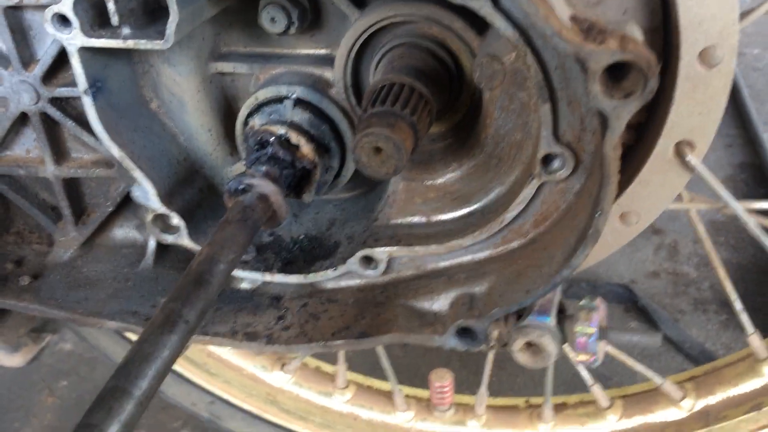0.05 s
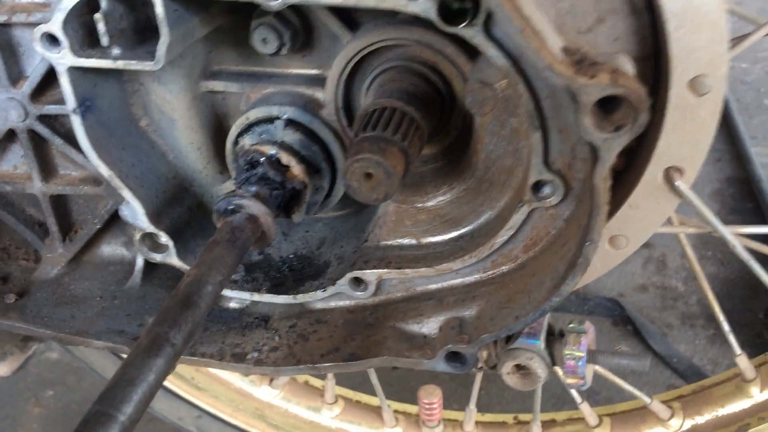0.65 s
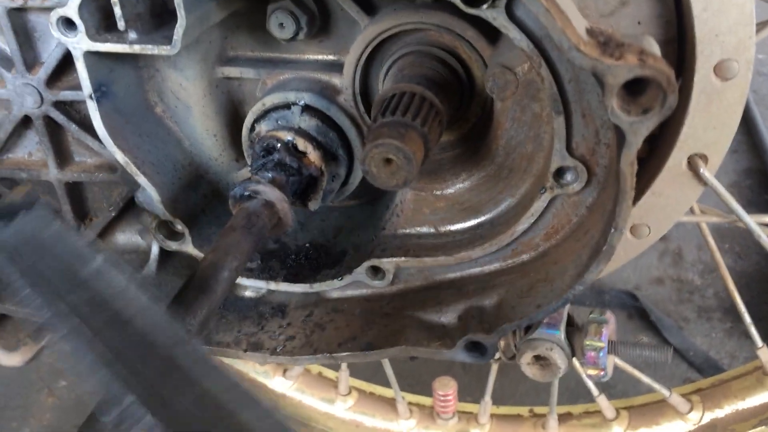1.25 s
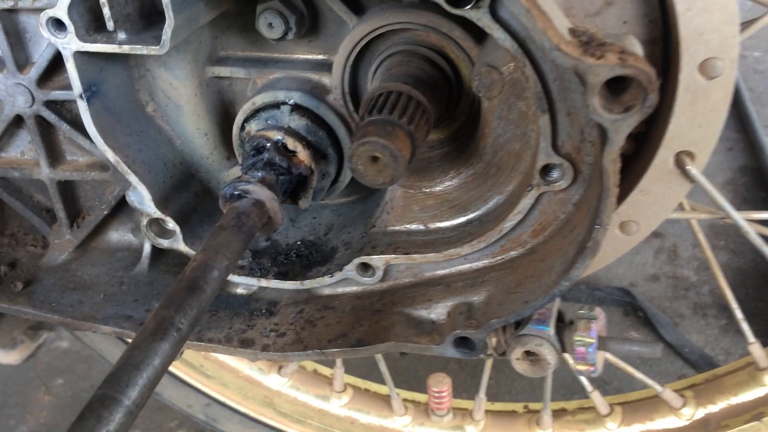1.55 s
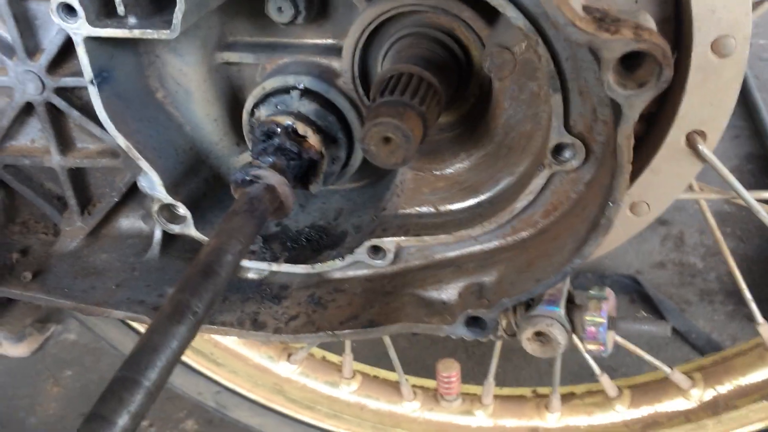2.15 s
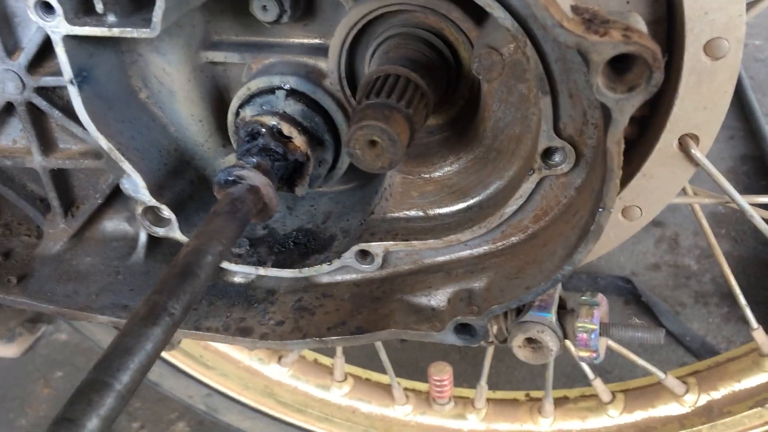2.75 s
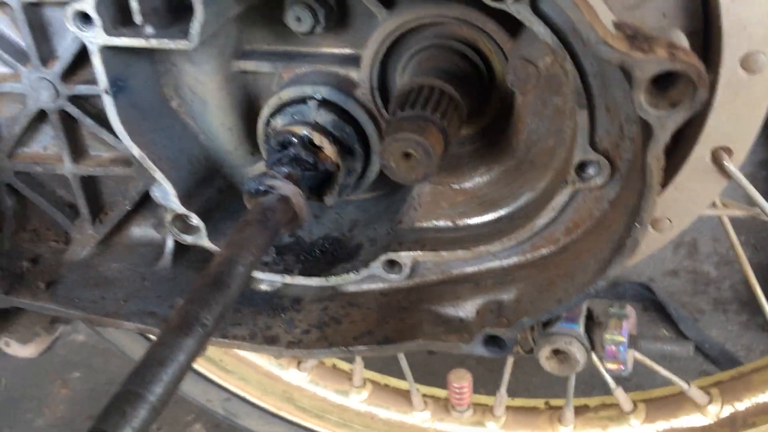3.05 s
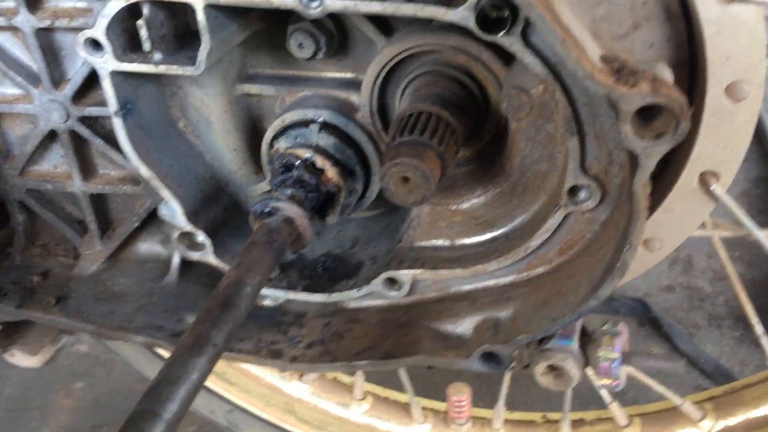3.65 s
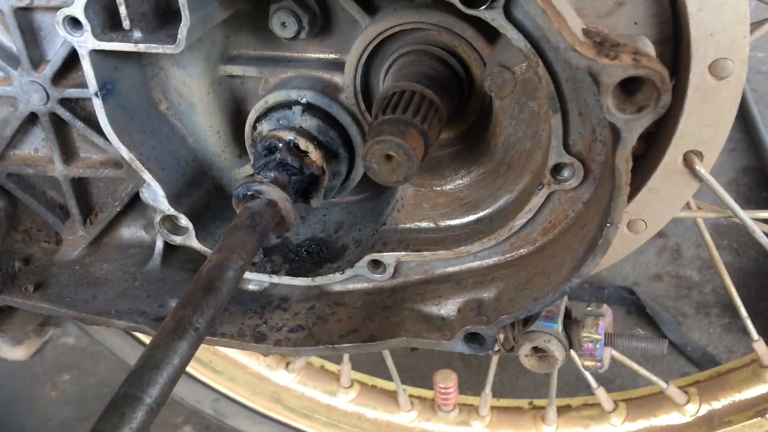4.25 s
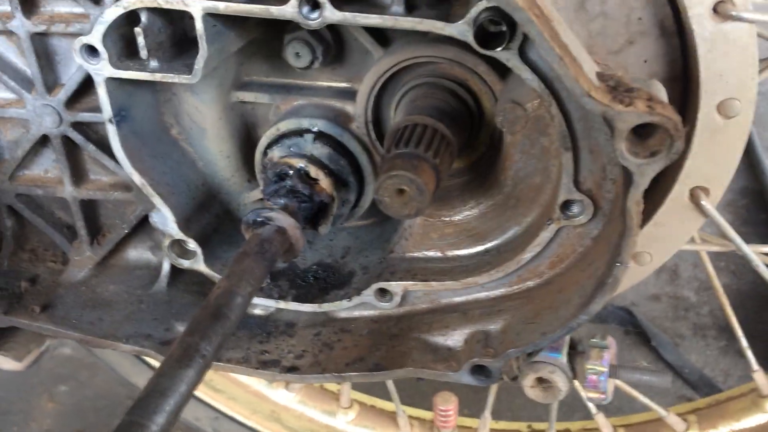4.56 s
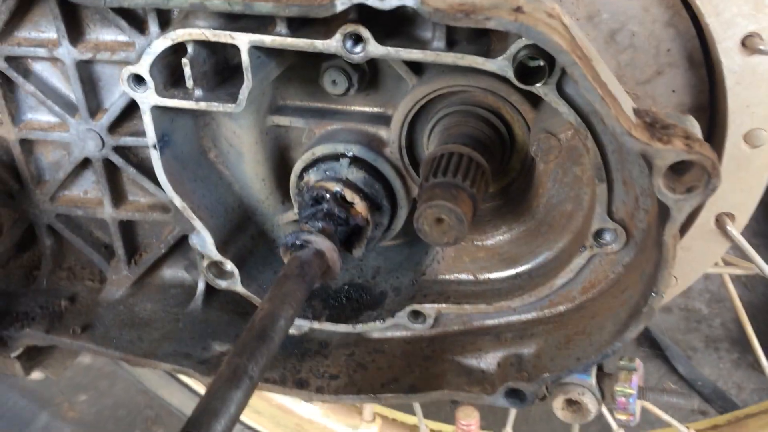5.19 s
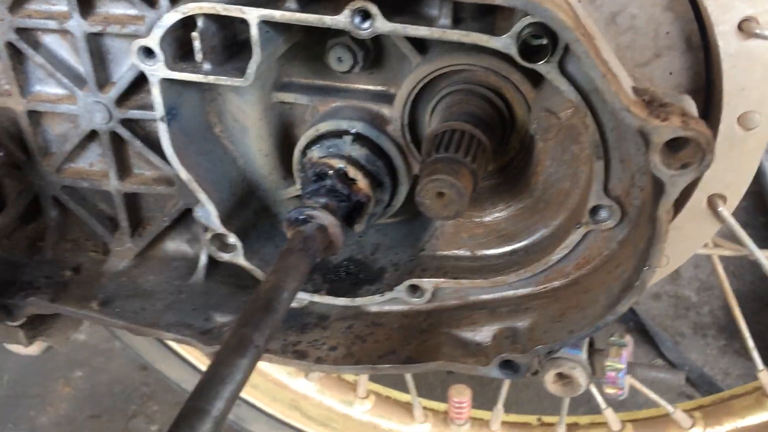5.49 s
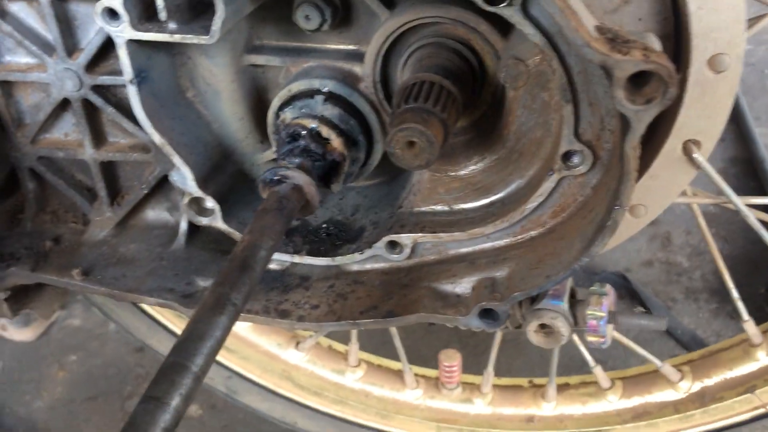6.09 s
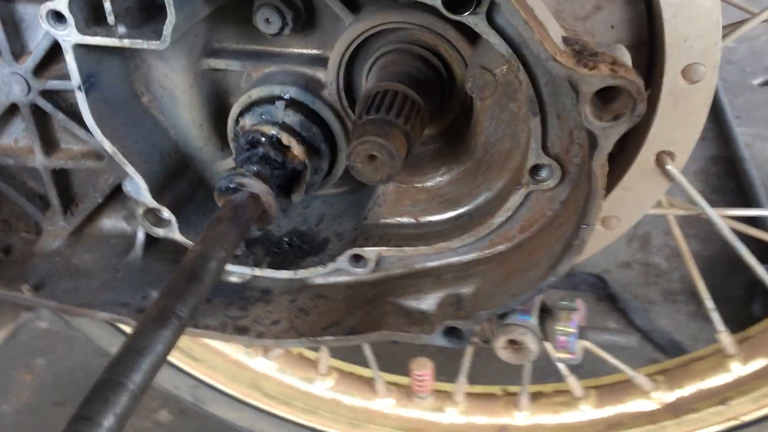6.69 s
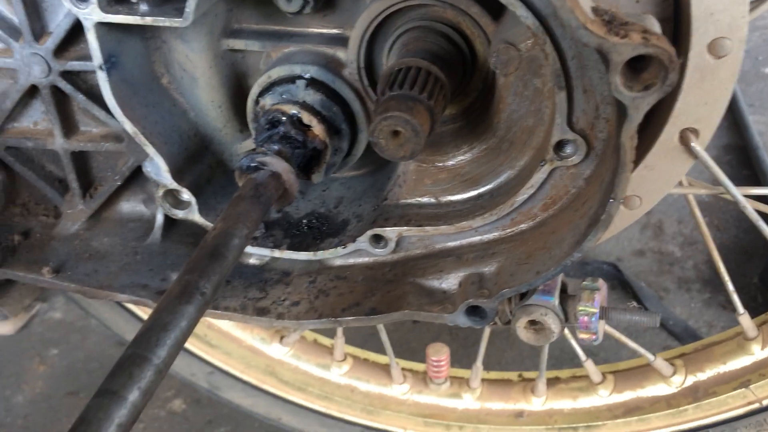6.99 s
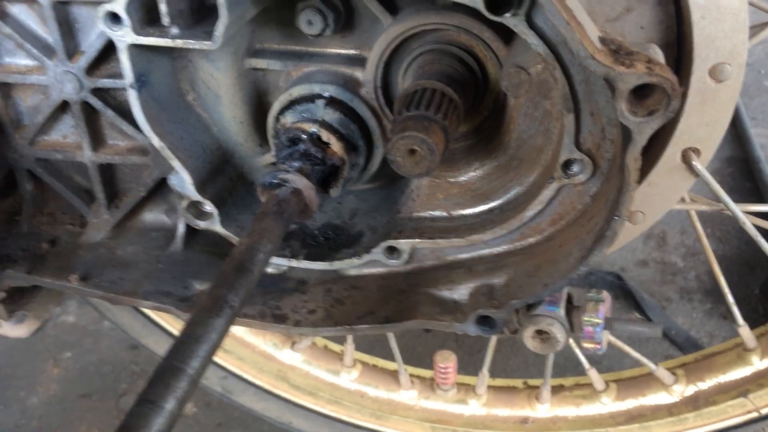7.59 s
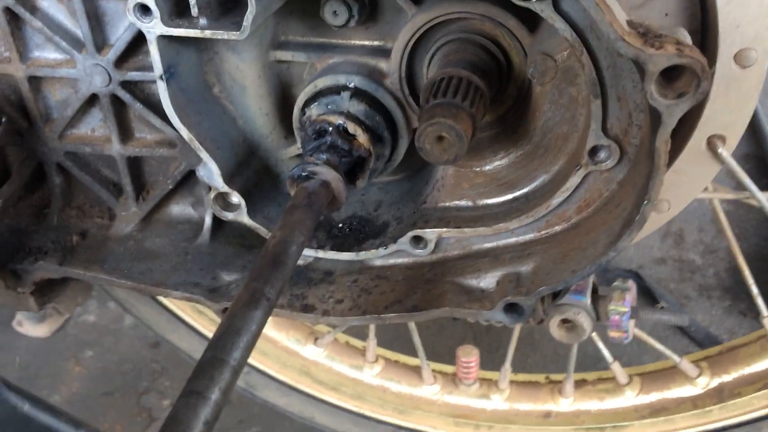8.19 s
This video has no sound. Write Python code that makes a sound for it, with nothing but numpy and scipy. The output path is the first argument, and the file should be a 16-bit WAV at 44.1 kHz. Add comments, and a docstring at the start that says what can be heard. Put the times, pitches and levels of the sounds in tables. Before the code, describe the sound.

Close, sharp steel clanks repeat in pairs as a sliding weight is yanked along a rod against its stop. The weight clinks and rasps before each blow, and the engine case clunks and rattles briefly with it. Early on, a low engine hum outside winds down and disappears, leaving faint room hiss. The hammering keeps going, with a couple of dull knocks and a short workshop echo.

```python
"""Slide hammer pulling a bearing

Close up in a small workshop, a slide hammer draws a bearing from an engine case. On each pull the
weight clinks at the inner end, scrapes out along the steel rod and slams into the stop, jolting the
case and its frame. An engine hums outside and slows away. A limiter flattens every blow."""
import sys
import numpy as np
from scipy import signal
from scipy.fft import rfft, irfft, next_fast_len
from scipy.io import wavfile
from scipy.ndimage import uniform_filter1d, minimum_filter1d

SR = 44100
rng = np.random.default_rng(int(sys.argv[2]) if len(sys.argv) > 2 else 0)


def bounce(signal):
    """Save signal as a 16-bit WAV file at the path given by the first command-line argument."""
    frames = np.transpose(np.atleast_2d(signal))
    limited = np.clip(frames, -1, 1)
    pcm = np.round(limited * 32767).astype(np.int16)
    wavfile.write(sys.argv[1], SR, pcm)


N = 372204
T = np.arange(SR // 4) / SR  # seconds since a contact
TOP_HZ = 15450  # upper edge of the sound


def amp(db):
    return 10 ** (np.asarray(db) / 20)


def unit(x):
    """Scales to an energy of 1."""
    return x / np.sqrt(np.sum(x ** 2) + 1e-20)


def decay(t60, t=T):
    """Falls 60 dB in t60 seconds."""
    return np.exp(-np.log(1000) * t / t60)


def curve_at(points, hz):
    """Joins (Hz, value) points on a log-frequency axis."""
    f, value = np.transpose(points)
    return np.interp(np.log(hz + 1), np.log(f + 1), value)


def add(mix, start_s, sound):
    part = mix[round(start_s * SR):][:len(sound)]
    part += sound[:len(part)]


def shaped_noise(gain_at, size):
    """Noise of rms 1, coloured by a gain for each frequency."""
    padded = next_fast_len(size, True)
    spectrum = rfft(rng.standard_normal(padded)) * gain_at(np.fft.rfftfreq(padded, 1 / SR))
    return unit(irfft(spectrum, padded)[:size]) * np.sqrt(size)


def noise(spectrum, size):
    """Noise that follows (Hz, dB) points."""
    return shaped_noise(lambda f: amp(curve_at(spectrum, f)), size)


def band(hz, width_hz, size):
    """Noise in one resonance."""
    return shaped_noise(lambda f: 1 / (1 + ((f - hz) / width_hz * 2) ** 2), size)


def ring(modes, scatter_db, detune, stutter, linger_db, linger_stretch=5.14):
    """Dying sines; no two contacts excite them alike, and loose parts make each one stutter."""
    hz, t60, db = np.transpose(modes)[:, :, None]
    level, shift, polarity = rng.standard_normal((3, len(hz), 1))
    waver = 1 + stutter * signal.resample(rng.standard_normal((len(hz), 36)), len(T), axis=1)
    # contact damps a mode fast; once the parts let go, a faint rest rings on longer
    fade = decay(t60) + amp(linger_db) * decay(linger_stretch * t60)
    sines = np.sin(2 * np.pi * hz * (1 + detune * shift) * T) * np.sign(polarity)
    strength = amp(db + scatter_db * level) / np.sqrt(t60)
    return unit((strength * sines * waver * fade).sum(0))


def crack(spectrum, t60):
    """A crowd of short modes, too dense to tell apart."""
    return unit(noise(spectrum, len(T)) * decay(t60))


# Colour of the room tone. Each row: frequency in Hz, relative level in dB.
AIR_SPECTRUM = [(20, -25), (60, -12.5), (110, -4.5), (200, -19), (340, -11.5), (500, -16.5), (950, -23.5),
                (1500, -23), (3000, -26.5), (5500, -32.5), (11500, -40.5), (15000, -48)]
# The room tone settles as the engine leaves. Each row: time in seconds, level in dB.
AIR_LEVELS = [(0, -49), (3, -51.5), (4.3, -52), (8.4, -54.5)]
# A thin whine. Each row: pitch in Hz, level in dB.
WHINE_TONES = [(764.4, -61), (1432, -65.5)]


def workshop(buzz_hz=54.8, sizzle_db=-60, sharpness=1.8, flicker_db=4, sizzle_ends_s=6.5):
    """Room air and a faint, uneven sizzle that pulses twice a cycle, then gives way to a whine."""
    t = np.arange(N) / SR
    pulses = np.exp(sharpness * (np.cos(4 * np.pi * buzz_hz * t) - 1))
    flicker = amp(flicker_db * band(buzz_hz, 60, N))
    sizzle = amp(sizzle_db) * pulses * flicker * band(7400, 650, N)
    whine = sum(amp(db) * band(hz, 4, N) for hz, db in WHINE_TONES)
    air = amp(np.interp(t, *np.transpose(AIR_LEVELS))) * noise(AIR_SPECTRUM, N)
    return air + np.where(t < sizzle_ends_s, sizzle, whine)


# Swells and dips of the engine outside. Each row: time in seconds, relative level in dB.
ENGINE_LEVELS = [(0.0, -48.5), (0.36, -42.5), (1.01, -59.5), (1.16, -47), (1.36, -39.5), (2.04, -49),
                 (2.46, -39.5), (2.9, -58), (3.34, -44.5), (3.53, -65.5), (4.0, -47)]
# Resonances of its exhaust. Each row: frequency in Hz, gain in dB.
EXHAUST_SPECTRUM = [(35, -22), (56, -18), (80, -19), (110, -2), (150, 0.5), (170, -14), (220, -14.5),
                    (280, -22.5), (400, -21), (700, -48.5)]


def engine(level_db=7, idle_hz=55.6, sag_hz_per_s=1, slowing_hz_per_s=18,
           leaves_s=2.5, gone_s=3.73, fade_s=0.5, roughness=0.1, flutter=0.007):
    """Firing harmonics slide through the resonances of an exhaust: it idles, then slows and fades."""
    t = np.minimum(np.arange(N) / SR, gone_s)
    firing_hz = idle_hz - sag_hz_per_s * t - slowing_hz_per_s * np.maximum(t - leaves_s, 0)
    firings = np.cumsum(firing_hz * (1 + flutter * band(0, 32.7, N))) / SR
    hum = np.zeros(N)
    for k in range(1, 11):
        gain = amp(curve_at(EXHAUST_SPECTRUM, k * firing_hz))
        hum += gain * np.cos(2 * np.pi * (k * firings + rng.random() / 4))
    level = amp(level_db + np.interp(t, *np.transpose(ENGINE_LEVELS)))
    fade = np.minimum((gone_s - t) / fade_s, 1)
    return level * fade * (hum + roughness * noise(EXHAUST_SPECTRUM, N))


# The shiver of loose parts. Each row: frequency in Hz, relative level in dB.
SHIVER_SPECTRUM = [(400, -13), (1800, -2.5), (5000, -12.5), (14000, -27)]
# Dense, short modes of the steel. Each row: frequency in Hz, relative level in dB.
STEEL_SPECTRUM = [(80, -23), (300, -21), (680, -5.5), (1050, -13), (1500, -2.5), (2050, -8), (2600, 1),
                  (4400, 1.5), (5400, -3), (7000, -3.5), (9500, -11), (15000, -15.5)]


def rattle(level_db=13, t60=0.25, rise_s=0.1, opening_db=-9):
    """Loose parts are still settling at the start, and shiver on without pitch after each blow."""
    out = np.zeros(N)
    add(out, 0, amp(opening_db) * crack(SHIVER_SPECTRUM, t60))
    swell = 1 - np.exp(-T / rise_s)
    for start, force_db, *_ in STOP_BLOWS:
        add(out, start, amp(level_db + force_db) * crack(STEEL_SPECTRUM, t60) * swell)
    return out


def handling(level_db=-46, lead_s=0.088, length_s=0.13):
    """A soft rumble as the hands settle on the tool before each pair of pulls."""
    out, size = np.zeros(N), int(length_s * SR)
    swell = np.sqrt(np.hanning(size))
    for start, *_ in PULL_STROKES[::2]:
        rumble = band(hz=92, width_hz=42, size=len(T))[:size]
        add(out, start - lead_s, amp(level_db) * rumble * swell)
    return out


# The ring of rod and weight. Each row: pitch in Hz, t60 in seconds, then energy in dB
# in a clink, in a slide and in a blow.
ROD_MODES = [(1594, 0.035, -12.5, -15.5, 0.5), (1915, 0.084, -20, -38.5, -11.5), (2327, 0.064, -2, -7, -5),
             (2438, 0.045, -8.5, -10, -5.5), (2673, 0.082, -13, -17.5, -6), (3030, 0.089, -13, -16.5, -29),
             (3111, 0.033, -11, -4, -24.5), (3348, 0.083, -12, -24.5, -4), (4090, 0.1, -17, -4.5, -32.5),
             (4531, 0.064, 1.5, 3, 8.5), (4612, 0.032, 5.5, -4, -12), (4880, 0.28, -30, -22.5, -15.5),
             (5958, 0.036, 0.5, -12, 0.5), (6180, 0.018, -3.5, -15.5, -31), (7474, 0.066, -6.5, -1.5, -12),
             (9250, 0.035, -8, -7, 3), (10280, 0.056, -38, -24.5, -11), (11060, 0.057, -10, -17, -5.5),
             (12200, 0.041, -26, -39, -36), (12920, 0.058, -15.5, -21.5, -8),
             (15500, .07, -13.5, -16, -29.5), (16000, .07, -24, -28, -16.5)]
# Tone controls of that ring, in Hz: a neutral anchor, then low, middle, main and bright.
ROD_BANDS_HZ = [1200, 2300, 3300, 4550, 5900]


def rod(contact, low_db, main_db, bright_db, crack_db, crack_t60, middle_db=0):
    """The rod's answer to one contact; where the weight touches decides which modes speak."""
    hz, t60, clink, slide, blow = np.transpose(ROD_MODES)
    energy_db = {"clink": clink, "slide": slide, "blow": blow}[contact]
    tone_db = np.interp(hz, ROD_BANDS_HZ, [0, low_db, middle_db, main_db, bright_db])
    modes = np.c_[hz, t60, energy_db + tone_db]
    ringing = ring(modes, scatter_db=1.5, detune=0.0016, stutter=0.68, linger_db=-31)
    steel = [(f, db + bright_db * (f > ROD_BANDS_HZ[-1])) for f, db in STEEL_SPECTRUM]
    return unit(ringing + amp(crack_db) * crack(steel, crack_t60))


# Pulls come in pairs; the grip colours the ring. Each row: start in seconds, then trims in dB
# for the clink, the slide, the slide's late push, low ring, main ring and brightness.
PULL_STROKES = [(0.336, -9, -18, 4, 3, -7, -3.5), (0.7754, -17, -18.5, 1, 3, -3, -4),
                (1.358, -6.5, -9.5, -11, -3, -7.5, -2), (1.7737, -10.5, -17.5, 3, -8.5, -1, -2.5),
                (2.3339, -8, -18, 3, 5.5, -5.5, 1.5), (2.7313, -10.5, -15, -3.5, 1.5, -6, -0.5),
                (3.311, -8, -9.5, -11.5, -4, 1.5, -3.5), (3.6887, -9.5, -16, 1, -2, -3, -1.5),
                (4.1747, -7, -24.5, 11, 3, -5.5, -2), (4.7258, -12, -13.5, -2.5, 0, -8, -2.5),
                (5.254, -7.5, -22, 2, -9, -7, -2), (5.6974, -11, -18.5, 2, -0.5, -2.5, 0.5),
                (6.1942, -8.5, -20.5, 6.5, 11, -0.5, 0.5), (6.6208, -4, -14, -1, 3.5, -2.5, -3),
                (7.394, -5, -19, 0, 10.5, -1.5, -3), (7.772, -11, -14.5, 0.5, 11, 3, -2),
                (8.2666, -7, -21.5, 8, 0.5, -6.5, -5.5)]
# The loose weight bounces and chatters on the rod. Each row: start in seconds, force in dB.
WEIGHT_BOUNCES = [(0.38, -25), (0.8031, -22.5), (1.476, -9.5), (1.8179, -17.5), (1.8522, -18),
                  (2.3637, -23), (2.5768, -22), (3.414, -27.5), (3.771, -16.5), (4.2249, -18.5),
                  (4.7603, -30), (4.7717, -40), (5.286, -27.5), (5.3802, -19), (5.7307, -18),
                  (5.749, -12.5), (6.241, -14), (6.4662, -22.5), (7.4494, -17.5), (7.483, -2.5),
                  (8.3295, -21)]


def clinks(level_db=29.5, first_bright_db=2, bounce_bright_db=-1.5):
    """The weight rings against the inner end as each pull starts; its bounces are duller."""
    out = np.zeros(N)
    for hits, sparkle_db in (PULL_STROKES, first_bright_db), (WEIGHT_BOUNCES, bounce_bright_db):
        for start, force_db, *_ in hits:
            pulls_begun = [pull for pull in PULL_STROKES if pull[0] <= start]
            *_, low, main, bright = pulls_begun[-1]
            clink = rod("clink", low, main, bright + sparkle_db, crack_db=-4, crack_t60=0.045)
            add(out, start, amp(level_db + force_db) * clink)
    return out


def slides(level_db=0.5, catches_per_s=2200, spread_db=5.5, rise_db=44.5, uneven_db=0.6,
           case_db=-22, dip_s=0.0095):
    """The weight rasps over the rod in many tiny catches, harder as it gathers speed."""
    out = np.zeros(N)
    for (start, _, slide_db, push_db, low, _, bright), (stop, *_) in zip(PULL_STROKES, STOP_BLOWS):
        pull_s = stop - start
        length_s = min(0.06 + 0.4 * pull_s, pull_s - dip_s, T[-1])
        size = int(length_s * SR)
        chance, side, height = rng.random((3, len(T)))[:, :size]
        strength = amp(-spread_db * np.log(height + 0.0099))
        catches = (chance < catches_per_s / SR) * np.sign(side - 0.5) * strength
        progress = np.linspace(0, 1, size)
        swell_db = -rise_db * (1 - progress) ** 2.83 + push_db * np.maximum(2 * progress - 1, 0)
        waver_db = uneven_db * band(0, 250, len(T))[:size]
        friction = unit(catches) * np.sqrt(size) * amp(level_db + slide_db + swell_db + waver_db)
        steel = rod("slide", 0.7 * low, main_db=-3, bright_db=bright - 4, crack_db=-3.5, crack_t60=0.035)
        scrape = signal.fftconvolve(friction, steel + amp(case_db) * case())
        # a brief dip just before each blow, like a limiter ducking ahead of the peak
        add(out, stop - dip_s - length_s, scrape)
    return out


# Modes of the engine case; the short ones give each blow its hard, dry crack.
# Each row: pitch in Hz, t60 in seconds, energy in dB.
CASE_MODES = [(341, 0.048, -13), (459.4, 0.14, -9.5), (588, 0.0089, 2), (686, 0.019, 2.5), (915, 0.014, -4),
              (1290, 0.021, -4.5)]
# Dense, short modes of the casting. Each row: frequency in Hz, relative level in dB.
CASTING_SPECTRUM = [(25, -18.5), (70, -8.5), (270, -10.5), (480, 0.5), (750, -13.5), (1100, -8), (1700, 1),
                    (4000, -9), (15000, -21)]


def case(crack_db=-4):
    """The dull clunk of the cast case."""
    body = ring(CASE_MODES, scatter_db=4.5, detune=0.02, stutter=0.17, linger_db=-36)
    return body + amp(crack_db) * crack(CASTING_SPECTRUM, t60=0.043)


# The low end under each hit. Each row: pitch in Hz, t60 in seconds, energy in dB.
FRAME_MODES = [(62.3, 0.057, -4), (120, 0.039, -2), (194, 0.032, -5)]


def frame():
    """The low thud of the frame that holds the case."""
    return ring(FRAME_MODES, scatter_db=1, detune=0.04, stutter=0.29, linger_db=-39.5)


# Each pull ends at the stop. Each row: start in seconds, then trims in dB for the force
# on the rod, its ring, the case's clunk, the frame's thud and the recoil.
STOP_BLOWS = [(0.5517, -4, -8, -2.5, -13, -33), (0.896, 0, 0, -1.5, -9, -23),
              (1.516, -1.5, 2.5, -4.5, -12, -9), (1.8872, 0.5, 16, -6.5, 5.5, -25),
              (2.475, -3.5, 0.5, -3, -14, -24), (2.8397, -1, 1.5, -6, -28, -12),
              (3.4582, -5.5, 7, -2.5, -6.5, -17.5), (3.8026, -3.5, 7.5, 0.5, -8, -17),
              (4.4348, -0.5, -2.5, -1.5, -33, -22.5), (4.7987, 0, -4.5, -5.5, -5, -12),
              (5.4087, -4, 4.5, -2.5, -5, -12.5), (5.7832, -2.5, 1, -1, -13, -10.5),
              (6.3812, -4, -2, -7, -3.5, -24), (6.7231, 2.5, -5, -1.5, -23, -24.5),
              (7.5252, -4, 9, -7, -8.5, -12.5), (7.8682, -3, 8, -4, -20, -29.5), (8.45, -4, 0, -3, -6, -15)]


def blows(rod_db=26, case_db=23, frame_db=14.5):
    """The stop takes the whole swing: the rod rings lengthwise, tugs the case and shakes the frame."""
    out = np.zeros(N)
    for start, force_db, ring_db, clunk_db, thud_db, _ in STOP_BLOWS:
        clang = rod("blow", low_db=3, middle_db=ring_db + 2, main_db=ring_db - 1, bright_db=3,
                    crack_db=-4.5, crack_t60=0.056)
        add(out, start, amp(rod_db + force_db) * clang)
        add(out, start, amp(case_db + clunk_db) * case() + amp(frame_db + thud_db) * frame())
    return out


# The puller drops back in its seat. Each row: start in seconds, force in dB,
# then sharp crack and frame thud, both in dB against the clunk.
SEAT_KNOCKS = [(5.0645, -8, 0, -13), (5.116, -30, 2, -16), (5.157, -37, 3.5, -17), (5.6975, -13, -16, 2.5),
               (6.963, -2, -2, -16.5), (7.007, -26.5, 10, -20)]


def knocks(level_db=15, shiver_db=-5, recoil_s=0.019, recoil_crack_db=-21, recoil_thud_db=-22):
    """The puller clunks on the case as it recoils or reseats; bare steel cracks, loose parts shiver."""
    out = np.zeros(N)
    recoils = [(start + recoil_s, db, recoil_crack_db, recoil_thud_db) for start, *_, db in STOP_BLOWS]
    for start, force_db, crack_db, thud_db in SEAT_KNOCKS + recoils:
        steel = crack(STEEL_SPECTRUM, t60=0.012) + amp(shiver_db) * crack(SHIVER_SPECTRUM, t60=0.36)
        knock = case() + amp(crack_db) * steel + amp(thud_db) * frame()
        add(out, start, amp(level_db + force_db) * knock)
    return out


# The workshop's short reverb. Each row: frequency in Hz, t60 in seconds.
ROOM_DECAYS = [(60, 0.12), (400, 0.24), (1500, 0.34), (4500, 0.29), (9000, 0.3), (15000, 0.32)]


def room(x, predelay_s=0.0074, reflections_per_s=4000, treble_db=-4):
    """Sparse reflections of random sign, each band dying at its own speed."""
    taps = rng.choice([-1., 1.], SR) * (rng.random(SR) < reflections_per_s / SR)
    taps *= np.arange(SR) > predelay_s * SR
    hz, t, bands = signal.stft(taps, SR, nperseg=256)
    bands *= decay(curve_at(ROOM_DECAYS, hz)[:, None], t)
    tail = unit(signal.istft(bands, SR, nperseg=256)[1])
    tilt = amp(treble_db * np.fft.rfftfreq(len(tail), 1 / SR) / TOP_HZ)
    return signal.fftconvolve(x, irfft(rfft(tail) * tilt))[:N]


def scene():
    """Tool, case and their echo in the workshop, over the engine and the room tone."""
    tool = clinks() + slides()
    slam = blows() + rattle()
    clunk = knocks()
    echo = room(amp(-19) * tool + amp(-17) * slam + amp(-13.5) * clunk)
    return (tool + slam + clunk + echo + engine() + handling() + workshop())[None]


def record(dry, low_cut_hz=42, threshold_db=0, recovery_db_per_s=600, full_scale=0.63):
    """Low cut, a fast look-ahead limiter that ducks just before each peak, soft overload, high cut."""
    x = signal.sosfilt(signal.butter(2, low_cut_hz, "highpass", fs=SR, output="sos"), dry[0])
    over_db = np.maximum(20 * np.log10(abs(x) + 1e-9) - threshold_db, 0)
    held_db = -minimum_filter1d(-over_db, size=220)
    recovery_db = np.arange(N) * recovery_db_per_s / SR
    duck_db = uniform_filter1d(np.maximum.accumulate(held_db + recovery_db) - recovery_db, size=200)
    saturated = full_scale * np.tanh(x * amp(-duck_db) / full_scale)
    high_cut = signal.firwin(255, TOP_HZ, window=("kaiser", 8), fs=SR)
    return signal.oaconvolve(saturated, high_cut, "same")[None]


dry = scene()
out = record(dry)
bounce(out)
```